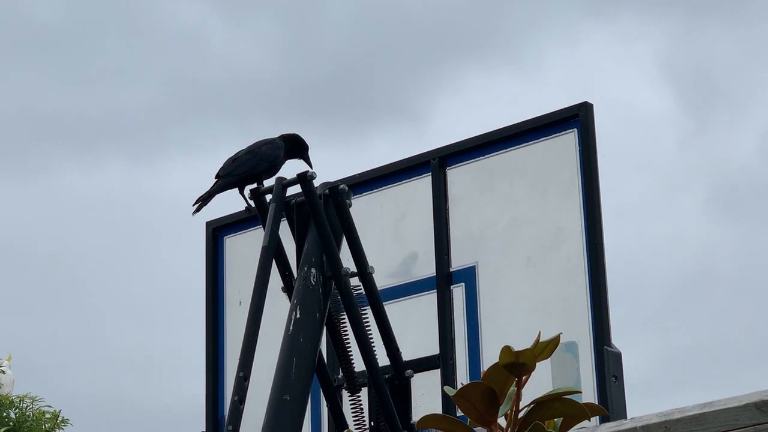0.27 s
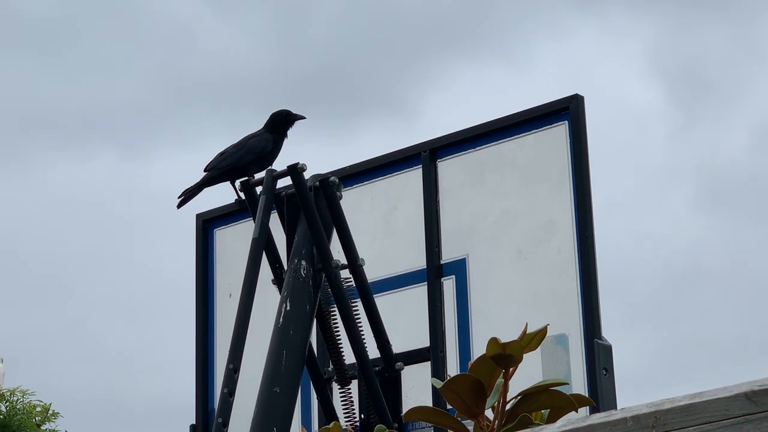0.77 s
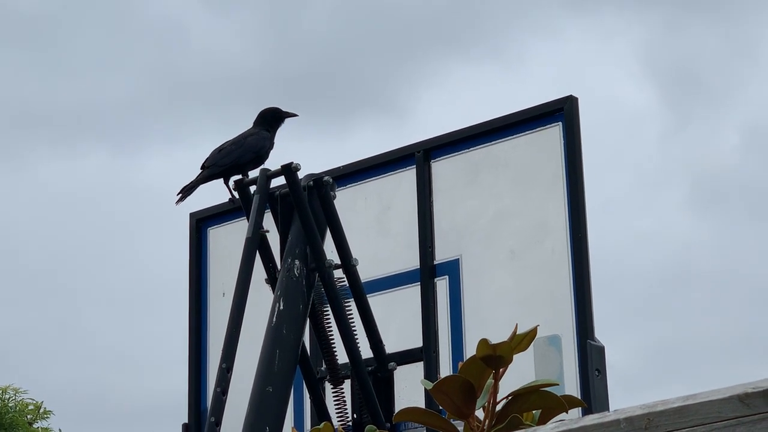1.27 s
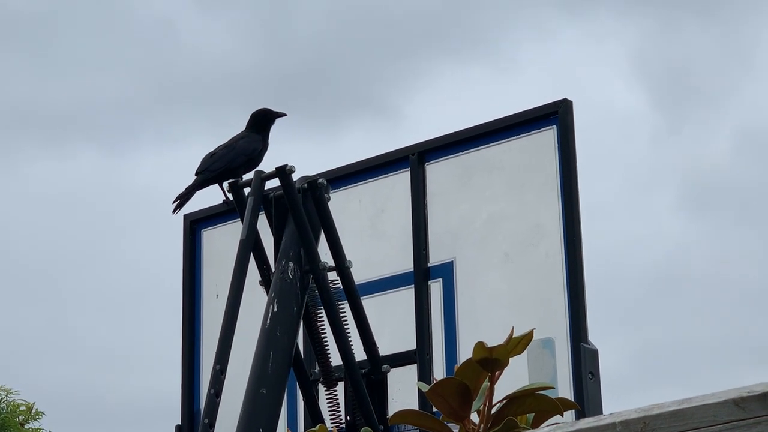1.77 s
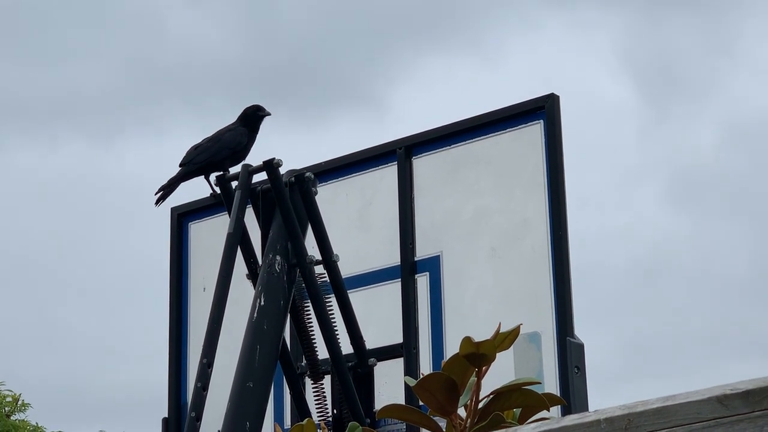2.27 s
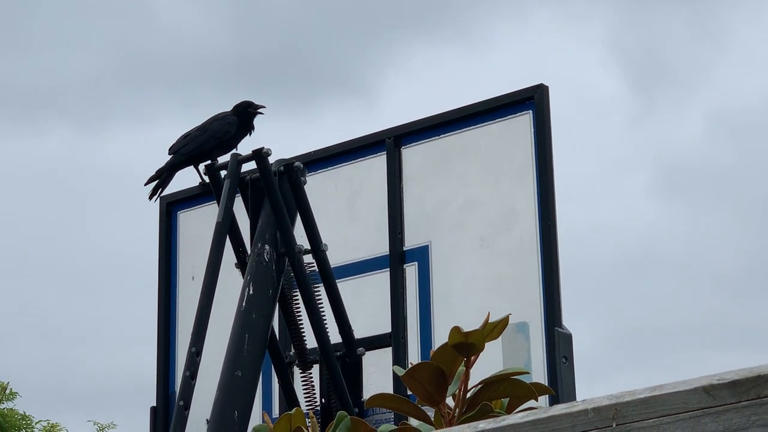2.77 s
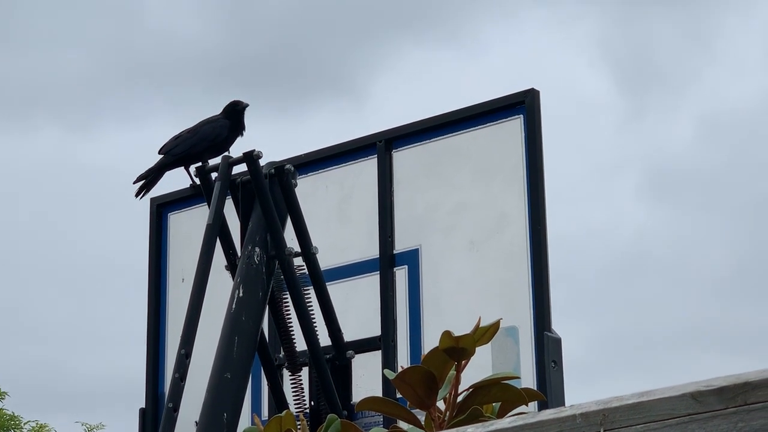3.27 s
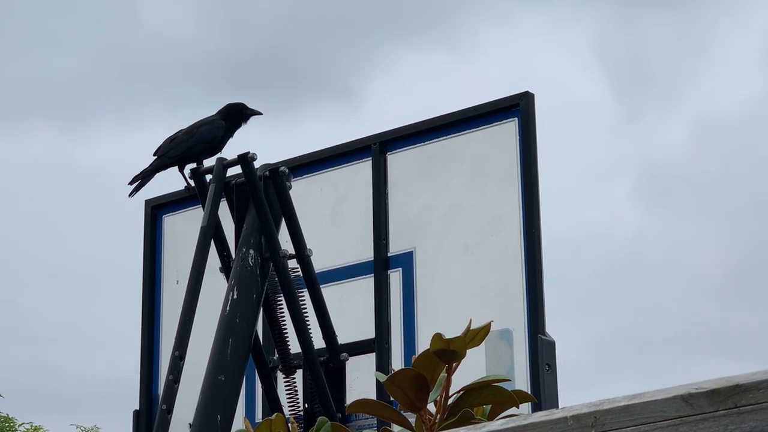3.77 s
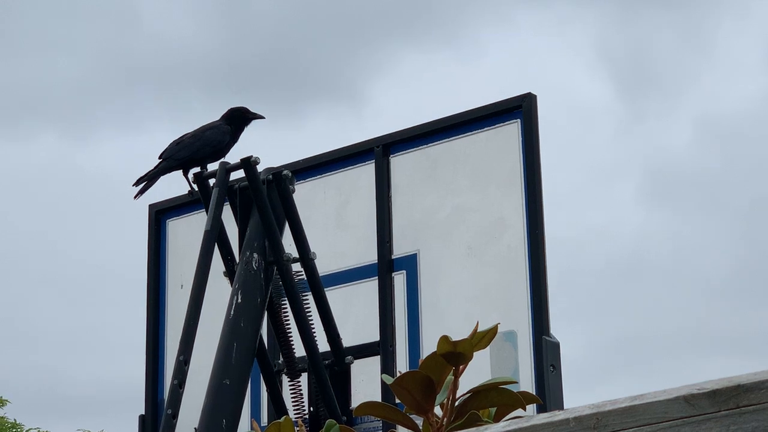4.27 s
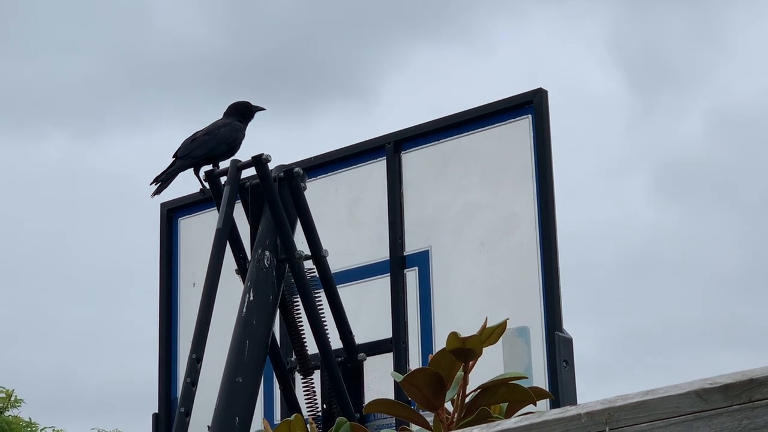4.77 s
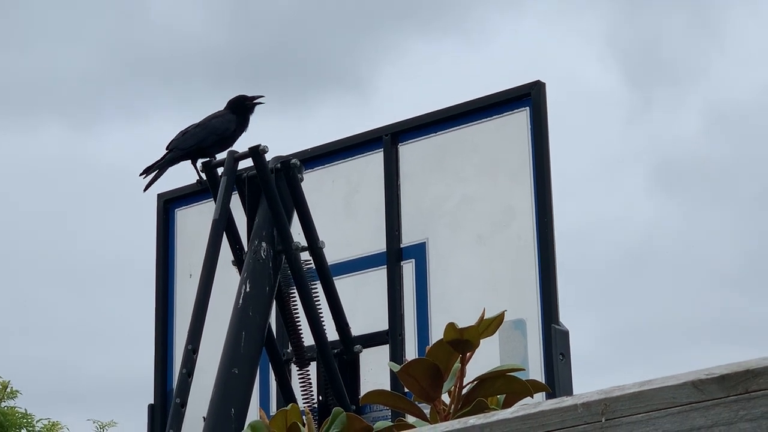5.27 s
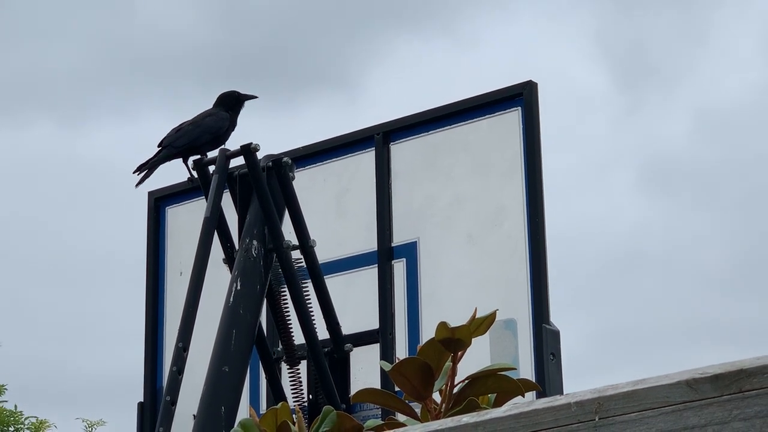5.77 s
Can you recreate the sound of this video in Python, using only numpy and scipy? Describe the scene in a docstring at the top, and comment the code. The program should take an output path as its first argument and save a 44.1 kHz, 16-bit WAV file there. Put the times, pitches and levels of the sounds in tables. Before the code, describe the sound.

A perched crow gives three short, hoarse caws, starting about halfway through and growing louder. A small bird's thin chirps and gliding whistles come before and between them, along with three faint ticks later on. Underneath, a far propeller plane hums, slowly sinking in pitch, and distant traffic murmurs. Wind rumbles lightly on the microphone in the open yard, buffeting it briefly after the second caw.

```python
"""First come the drone of a far propeller plane, sinking in pitch as it passes, and wind buffeting the
two microphone ports. A small songbird scolds and twitters in gliding whistles, and a crow on a perch
caws three times, its slow, sharp pulses ringing the moving resonances of its throat. The perch and the
walls of the yard reflect both birds. Behind them lie three small ticks, another bird's far whistle,
the roar of distant traffic and a faint high hiss."""
import sys
import numpy as np
from scipy import signal
from scipy.fft import rfft, irfft
from scipy.io import wavfile
from scipy.ndimage import uniform_filter1d

SR = 44100
rng = np.random.default_rng(int(sys.argv[2]) if len(sys.argv) > 2 else 0)


def persist_wave(psi):
    """Save psi, clipped to +-1, as 16-bit WAV."""
    counts = np.round(np.clip(psi, -1, 1) * 32767).astype(np.int16)
    wavfile.write(sys.argv[1], SR, np.atleast_2d(counts).T)


N = 266055

# The crow's drive, one list a caw. Each row: time in seconds, effort in dB, pulse rate in Hz.
CAWS = [
    [(2.678, -56.5, 115.2), (2.73, -51.5, 124.9), (2.774, -47, 145.9), (2.854, -44, 155.4),
     (2.92, -43.5, 146.8), (2.976, -48, 129.7), (2.992, -51.5, 120.6), (3.012, -68, 116.3)],
    [(3.412, -49, 96.4), (3.445, -42.5, 119.5), (3.477, -37, 145.5), (3.501, -33, 165.7),
     (3.569, -30.5, 186.7), (3.613, -33.5, 166.7), (3.64, -37.5, 125.1), (3.665, -61.5, 88.7)],
    [(5.102, -54.5, 104.7), (5.125, -55, 121.1), (5.14, -39.5, 134.4), (5.161, -34, 161.3),
     (5.197, -30.5, 192.9), (5.251, -29.5, 206.1), (5.323, -31.5, 178.2), (5.36, -34.5, 151.1),
     (5.387, -41, 115), (5.405, -70, 106)],
]
# Timbre of each caw, mouth wide open. Each row: first, second and third resonance in Hz; levels of
# rasp, top snap and third resonance in dB; unevenness of the pulses as a factor; hoarseness in dB.
OPEN_MOUTH = [(1530, 2690, 4450, -15.5, -33, -16.5, 3.1, -8.5),
              (1556, 2470, 4400, -4.5, -14.5, -14.5, 1.1, -15),
              (1486, 2365, 4130, -6, -23.5, -15, 0.98, -12.5)]
# Each caw, mouth shut. Each row: the three resonances as shares of their open pitch, rasp change in dB.
SHUT_MOUTH = [(0.815, 0.98, 0.79, -6.5), (0.71, 0.78, 0.86, -4.5), (0.75, 0.82, 0.82, -10.5)]
# For each of the three resonances, the share of its rise that stays when the pulses slow again.
RISE_HELD = (0.77, 0.089, 0.65)
# The two lowest throat resonances. Each row: width in Hz, gain in dB.
THROAT = [(280, 6), (500, 1.5)]
# High resonances of the rasp. Each row: open-mouth centre in Hz, width in Hz, gain in dB.
RASP_BANDS = [(5350, 1200, -5), (6700, 1200, -4), (8900, 1900, 0), (11000, 1500, -12)]

# The songbird's phrase. Each row: onset and length in seconds before stretching; start, middle and
# end pitch in Hz; relative level in dB; roughness from 0 to 1.
PHRASE = [(0, 0.039, 1680, 1734, 1774, -4, 0.2), (0.027, .055, 4070, 4300, 4950, 0, 0.26),
          (0.062, .04, 5400, 5600, 5750, -7, .3)]
# Repeats of the phrase. Each row: start in seconds, level in dB, time stretch as a factor.
PHRASE_REPEATS = [(.774, -49.5, 1), (1.6, -73, 1.2), (3.77, -61, 1.05), (4.984, -63, 1.44)]
# Rough single notes. Each row: start and length in seconds; start, middle and end pitch in Hz;
# level in dB.
SCOLDS = [(.496, .023, 2620, 2630, 2580, -67.5), (.508, 0.04, 4100, 3850, 3570, -67.5),
          (.549, 0.028, 3680, 3380, 2980, -62.5), (.555, 0.054, 6300, 5870, 5670, -70.5),
          (.609, 0.041, 5130, 4660, 4140, -66), (.638, 0.018, 6900, 6650, 6400, -72),
          (.664, 0.064, 3830, 4300, 4500, -77), (.733, 0.039, 3020, 2970, 3020, -64.5),
          (.752, 0.035, 1887, 1898, 1770, -56.5), (1.675, 0.074, 5200, 5160, 5350, -77),
          (2.495, 0.029, 2130, 2214, 2320, -74.5), (2.518, 0.078, 3480, 3760, 3930, -64),
          (2.532, 0.2, 5100, 5150, 5320, -73.5), (2.51, 0.039, 6800, 7050, 6900, -82),
          (2.69, 0.057, 4130, 4380, 4300, -62)]
# Short clear glides, with the same columns.
TWITTER = [(4.09, 0.02, 4220, 4510, 4930, -59.5), (4.1, 0.033, 3510, 3680, 3700, -60),
           (4.133, 0.014, 4040, 4400, 4900, -59), (4.145, .018, 3520, 3800, 4360, -57),
           (4.18, 0.015, 3630, 3770, 4100, -59.5), (4.24, 0.051, 4650, 4660, 4980, -60.5),
           (4.265, 0.012, 5380, 5700, 5470, -63), (4.305, .025, 3820, 4100, 4400, -60.5)]
# Another bird's plain whistle, one such row.
FAR_WHISTLE = (4.505, .15, 1780, 1900, 1680, -67.5)
# Notes that shoot up and droop. Each row: start and length in seconds, crest in Hz, level in dB.
HOOKS = [(4.158, .022, 5330, -60), (4.193, 0.039, 5600, -65.5), (4.222, 0.033, 5570, -62),
         (4.319, .038, 5410, -62.5)]
# Spells of faint scratchy chatter. Each row: start and end in seconds, level of a chip in dB.
CHATTER_SPELLS = [(0.499, .9, -79), (1.578, 1.8, -94), (2.499, 2.698, -83.5), (3.778, 3.933, -87),
                  (4.067, 4.393, -79.5), (4.954, 5.12, -83)]
# Decline of a whistle's harmonics. Each row: pitch of the note in Hz, step per overtone in dB.
OVERTONE_SLOPE = [(1750, -1), (3000, -18), (4200, -9), (5300, -24)]
# Response of the beak. Each row: frequency in Hz, gain in dB.
BEAK_RESPONSE = [(1900, -6.5), (3200, 9.5), (5000, 5), (8500, 2), (11000, -28)]

# Pitch of the propeller. Each row: time in seconds, blade tone in Hz.
BLADE_HZ = [(0, 121.8), (.9, 120), (3.4, 115.8), (4.8, 113.4), (6.03, 112.4)]
# Strength of the drone. Each row: time in seconds, levels of the first and second harmonic in dB.
BLADE_LEVELS = [(0, -34.5, -62), (.12, -36.5, -55), (.3, -42, -51.5), (.5, -45.5, -54), (.64, -39.5, -59),
                (1.03, -46.5, -67.5), (1.15, -45.5, -53), (1.9, -42.5, -45.5), (2.18, -40.5, -66),
                (2.45, -40.5, -54.5), (2.8, -39, -47), (3.2, -40, -49.5), (3.55, -38.5, -59),
                (3.8, -41.5, -54.5), (4.35, -42, -45), (4.8, -43, -54), (5.12, -40.5, -54.5),
                (5.45, -37.5, -48.5), (6.03, -36, -54.5)]
# The drone at the ports, by harmonic. Each row: left lead in radians, left minus right in dB.
BLADE_STEREO = [(0.08, -5.5), (-0.58, -7), (0.92, -5.5)]
# Gusts. Each row: time of the top in seconds, level change in dB, half width in seconds.
GUSTS = [(0.01, 4.5, 0.045), (.87, -1, 0.035), (2.33, 1.5, 0.21), (3.632, 1.5, 0.035), (3.718, 8.5, 0.055),
         (3.83, 11.5, 0.034), (4.151, 5, 0.095), (4.45, 4.5, 0.17), (5.049, 4, 0.047)]
# Gusts that thump the ports. Each row: start in seconds, peak in dB, pitch in Hz, length in seconds.
THUMPS = [(3.713, -31, 56.5, .06), (3.821, -21.5, 97.8, 0.029), (3.857, -27, 60, 0.037),
          (5.042, -39, 59, 0.076)]
# Nearby ticks. Each row: start in seconds, then bands of level in dB, centre and width in Hz and
# t60 in seconds.
TICKS = [(3.98, [(-50, 2200, 806, 0.013), (-58, 6000, 2500, 0.039), (-51, 11000, 3500, 0.015)]),
         (4.443, [(-45, 3400, 930, 0.014)]), (5.468, [(-39.5, 883, 400, 0.043), (-50.5, 3770, 1100, 0.078),
         (-62, 6700, 1400, 0.056)])]
# Swell of the far roar. Each row: time in seconds, level in dB.
ROAR_LEVEL = [(0, -53.5), (.9, -54.5), (1.9, -51.5), (2.5, -54.5), (3.1, -51), (4.5, -51.5), (4.9, -53),
              (5.3, -49.5), (5.7, -54.5), (6.03, -54)]

# Noise spectra. Each row: frequency in Hz, relative spectral density in dB.
WIND_SPECTRUM = [(15, -63), (25, 2.5), (50, 12.5), (90, 11), (150, 1.5), (220, -2), (300, -15.5),
                 (420, -55)]
ROAR_SPECTRUM = [(160, -17.5), (270, -2), (315, -1.5), (384, -9.5), (418, -4.5), (502, -10), (713, -9),
                 (1170, -16.5), (1940, -21.5), (3400, -33), (7800, -51.5), (10100, -85.5), (17200, -120)]
HISS_SPECTRUM = [(4000, -30), (7000, -12), (8300, 0), (10800, -1), (11700, -8), (12700, -3), (14500, -3),
                 (16000, -5)]
# Likeness of the two channels. Each row: frequency in Hz, coherence from 0 to 1.
WIND_COHERENCE = [(30, 0.94), (150, 1), (300, 0.059)]
ROAR_COHERENCE = [(300, 0.27), (600, 0.72), (1300, 0.035), (2500, 0.034), (7000, .1)]
# Phase between the ports; birds and hiss share the treble. Each row: frequency in Hz, left lead in
# radians.
CROW_LEAD = [(400, .3), (1800, .35), (2600, .75), (3000, 1.4), (3400, 2.5), (3700, 3), (4200, 2.1),
             (5200, 2.5), (6200, 1.6)]
BIRD_LEAD = [(2000, 1), (3600, 2.6), (4400, 1.4), (5400, 1), (6500, 1.5)]
TREBLE_LEAD = [(7500, 2.2), (8500, 1), (9500, 0), (10500, -1.5), (11500, -3.1), (12500, -3.9),
               (13500, -6.1), (15000, -6.6)]
ROAR_LEAD = [(300, 0.5), (600, 2.5), (1300, 6), (7000, 11.5)]
# Level step between the ports. Each row: frequency in Hz, left minus right in dB.
CROW_BALANCE = [(500, 1), (1400, -2.5), (2500, -3.5), (3400, -3), (4300, -7), (5800, -11), (6800, 0.5),
                (15000, 0)]
BIRD_BALANCE = [(3000, 5), (4500, -1.5), (5600, -1), (6500, -2), (8000, 1)]
WIND_BALANCE = [(40, 8.5), (150, -15.5), (300, -3.5)]
ROAR_BALANCE = [(300, -7.5), (600, 2), (7000, -1)]
# Decay of echoes from the perch and from walls and fences. Each row: frequency in Hz, t60 in seconds.
PERCH_DECAY = [(500, 0.021), (2000, 0.079), (5000, 0.16), (15000, .05)]
YARD_DECAY = [(500, 0.1), (2000, 0.46), (5000, 0.52), (9000, 0.066), (15000, 0.088)]
# Colour of the microphone. Each row: frequency in Hz, gain in dB.
MIC_RESPONSE = [(20, -24), (40, -3), (60, 0), (12500, 0), (14500, -3), (16000, -8)]


def caw(contour, open_mouth, shut_mouth):
    """Source and filter: uneven pulses and puffs of air ring resonances that rise as the mouth opens."""
    start = contour[0][0]
    t = np.arange(start, contour[-1][0], 1 / SR)
    effort_db, pulse_hz = curves(contour, t)
    *open_hz, rasp_db, snap_db, third_db, uneven, hoarse_db = open_mouth
    *shut_shares, shut_db = shut_mouth
    rise = (pulse_hz - pulse_hz[0]) / (pulse_hz.max() - pulse_hz[0])
    mouth = uniform_filter1d(rise, size=800).clip(0, 1)  # opens as the pulses quicken
    widest = np.maximum.accumulate(mouth)
    *throat_hz, third_hz = [hz * (share + (1 - share) * (mouth + held * (widest - mouth)))
                            for hz, share, held in zip(open_hz, shut_shares, RISE_HELD)]

    cycles = np.cumsum(pulse_hz * (1 + .005 * uneven * wobble(len(t), size=150))) / SR
    per_pulse = rng.standard_normal((int(cycles[-1]) + 1, 3))  # random strengths
    drive_spread, spit_spread, snap_spread = per_pulse[cycles.astype(int)].T
    pulses = unit_rms(np.diff(np.floor(cycles), prepend=0) / np.sqrt(pulse_hz))  # same power at any rate
    since_pulse = (cycles % 1) / pulse_hz
    puffs = unit_rms((cycles > 1) * np.exp(-since_pulse / 0.00081) * rng.standard_normal(len(t)))
    drive = (pulses + .07 * uneven * puffs) * amp(.5 * uneven * drive_spread)
    spit = (pulses + .6 * puffs) * amp(.9 * uneven * spit_spread)

    throat = sum((-1) ** k * amp(db) * resonance(drive, hz, width)
                 for k, (hz, (width, db)) in enumerate(zip(throat_hz, THROAT)))
    leak = resonance(drive, 990, width=1200)  # low harmonics leak past the throat
    gap_hz = sum(throat_hz) / 2  # breath fills the gap between the two resonances
    breath = bandpass(bandpass(puffs, gap_hz, width=1000), gap_hz, width=910)
    voice = unit_rms(throat) - amp(-14.5) * unit_rms(leak) + amp(hoarse_db) * unit_rms(breath)

    closed = 1 - mouth
    rasp = -sum((-1) ** k * amp(db) * resonance(spit, hz * (1 - .17 * closed), width)
                for k, (hz, width, db) in enumerate(RASP_BANDS))
    snap = resonance((pulses + .8 * puffs) * amp(2 * snap_spread), 13600, width=3600)
    third = resonance(drive + .3 * spit, third_hz, width=650)
    voice += amp(third_db + closed) * unit_rms(third)
    voice += amp(rasp_db + shut_db * closed) * unit_rms(rasp)
    voice += amp(snap_db + (shut_db - 1) * closed) * unit_rms(snap)
    return start, amp(effort_db) * voice


def whistle(length, start_hz, middle_hz, end_hz, level_db, rough, warp=1, tilt_db=0):
    """A gliding harmonic series filtered by the beak; random pitch and amplitude modulation roughen it."""
    n = round(length * SR)
    parabola = np.polyfit([0, .5, 1], [start_hz, middle_hz, end_hz], 2)
    hz = np.polyval(parabola, (np.arange(n) / n) ** warp)  # warp under 1 brings the middle early
    phase = 2 * np.pi * np.cumsum(hz * (1 + .06 * rough * wobble(n, size=24))) / SR
    slope_db = at_hz(OVERTONE_SLOPE, middle_hz) + tilt_db
    tone = np.zeros(n)
    for k in range(1, 7):
        gain = amp(slope_db * (k - 1) + at_hz(BEAK_RESPONSE, k * hz))
        tone += gain * (k * hz < SR / 2.5) * np.sin(k * phase)
    flutter = 1 + 1.3 * rough * wobble(n, size=40)
    return amp(level_db) * unit_rms(tone) * flutter * signal.windows.tukey(n, .45)


def birdsong():
    """Frequency glides form the songbird's phrases, scolds, twitter and hooks, and another bird's call."""
    song = np.zeros(N)
    for start, db, stretch in PHRASE_REPEATS:
        for onset, length, *pitches, step_db, rough in PHRASE:
            add(song, start + stretch * onset, whistle(stretch * length, *pitches, db + step_db, rough))
    for notes, rough in [(SCOLDS, .5), (TWITTER, .18)]:
        for start, *note in notes:
            add(song, start, whistle(*note, rough))
    for start, length, crest, db in HOOKS:
        add(song, start, whistle(length, .62 * crest, crest, .88 * crest, db, rough=.18, warp=.5))
    start, *note = FAR_WHISTLE
    add(song, start, whistle(*note, rough=.5, tilt_db=-38))
    return song


def chatter(chips_per_s=120, chip_s=.02, range_hz=(3000, 7000)):
    """Superposition of short rough chips, random in time, pitch and glide, gives a scratchy texture."""
    chips = np.zeros(N)
    for start, end, db in CHATTER_SPELLS:
        count = round(chips_per_s * (end - start))
        for when, height, glide in rng.random((60, 3))[:count]:
            bend = 1 + .25 * (glide - .3) * np.array([-1, 0, 1])
            pitches = np.interp(height, [0, 1], range_hz) * bend
            add(chips, start + when * (end - start), whistle(chip_s, *pitches, db, rough=1))
    return chips


def reflections(crow, bird):
    """Reverberation: the perch scatters the calls quickly, and walls and fences add a longer tail."""
    tail = echoes(amp(-15) * crow + amp(-18) * bird, YARD_DECAY)
    return echoes(amp(-7.5) * crow + amp(-8) * bird, PERCH_DECAY) + tail


def plane():
    """Three harmonics of the blade tone sink as the plane passes; moving air modulates phase and level."""
    t = np.arange(N) / SR
    blade_phase = 2 * np.pi * np.cumsum(curves(BLADE_HZ, t)[0]) / SR
    third_db = -68 + 4.5 * wobble(N, size=3000)  # the third harmonic comes and goes
    levels = curves(BLADE_LEVELS, t) + [third_db]
    drone = np.zeros((2, N))
    for k, (db, (lead, step_db)) in enumerate(zip(levels, BLADE_STEREO), 1):
        phase = k * (blade_phase + 0.23 * wobble(N, size=1500))
        pair = np.array([amp(step_db / 2) * np.sin(phase + lead), amp(-step_db / 2) * np.sin(phase)])
        drone += np.sqrt(2) * amp(db + 0.5 * wobble(N, size=2000)) * pair
    return drone


def wind(steady_db=-49, lumps_db=1.5):
    """Pressure fluctuations at the ports: low noise that swells in gusts, with brief tonal thumps."""
    t = np.arange(N) / SR
    gusts_db = sum(db * np.exp(-((t - top) / half_width) ** 2) for top, db, half_width in GUSTS)
    level = amp(steady_db + lumps_db * wobble(N, size=2000) + gusts_db)
    lead = [(20, 0.009), (400, 0.011)]
    rumble = stereo_noise(WIND_SPECTRUM, WIND_COHERENCE, lead, WIND_BALANCE, patchy_db=0.5)
    thumps = np.zeros(N)
    for start, db, hz, length in THUMPS:
        age = np.arange(0, length, 1 / SR)
        add(thumps, start, amp(db) * np.sin(np.pi * age / length) ** 2 * np.sin(2 * np.pi * hz * age))
    return level * rumble + thumps


def ticks(attack_s=0.00068):
    """Damped resonance: each tick is noise in one or more bands, dying exponentially."""
    track, t = np.zeros(N), np.arange(2000) / SR
    for start, bands in TICKS:
        for db, hz, width, t60 in bands:
            burst = unit_rms(resonance(rng.standard_normal(len(t)), hz, width))
            add(track, start, amp(db - 60 * t / t60) * (1 - np.exp(-t / attack_s)) * burst)
    return track


def far_roar():
    """Distant traffic and engine wash add up to partly coherent noise that slowly swells and ebbs."""
    level = amp(curves(ROAR_LEVEL, np.arange(N) / SR)[0])
    return level * stereo_noise(ROAR_SPECTRUM, ROAR_COHERENCE, ROAR_LEAD, ROAR_BALANCE, patchy_db=1.92)


def hiss(level_db=-82):
    """Faint treble noise, almost fully coherent between the ports in its top range."""
    coherence, centred = [(6000, .4), (9000, 0.99), (16000, 1.0)], [(20, 0), (400, 0)]
    return amp(level_db) * stereo_noise(HISS_SPECTRUM, coherence, TREBLE_LEAD, centred, patchy_db=1)


def echoes(x, decay):
    """Convolution with sparse taps of random sign, a set for each side; each band dies at its own rate."""
    taps = np.zeros((2, SR))
    delays = np.arange(40, SR - 20, 20) + rng.integers(0, 20, (2, (SR - 41) // 20))
    np.put_along_axis(taps, delays, rng.choice([-1., 1.], delays.shape), 1)
    hz, t, spectra = signal.stft(taps, SR, nperseg=128)
    tail = signal.istft(spectra * amp(-60 * t / at_hz(decay, hz)[:, None]), SR, nperseg=128)[1]
    return signal.fftconvolve(x[None], tail / np.linalg.norm(tail[0]), axes=1)[:, :N]


def at_ports(x, lead, balance):
    """A point source reaches the two ports with a phase lead and level step that depend on frequency."""
    hz = np.fft.rfftfreq(N, 1 / SR)
    left_gain = amp(at_hz(balance, hz) / 2) * np.exp(.5j * at_hz(lead, hz))
    return irfft(rfft(x) * np.array([left_gain, 1 / left_gain]), N)


def stereo_noise(spectrum, coherence, lead, balance, patchy_db):
    """Partial coherence: two channels share part of a random spectrum with drifting patches; rms 1."""
    frames, hz = N // 256 + 5, np.fft.rfftfreq(1024, 1 / SR)[:, None]
    left_re, left_im, own_re, own_im, patches = rng.standard_normal((frames, 513, 5)).T
    patches = unit_rms(uniform_filter1d(uniform_filter1d(patches, 8, axis=0), 12, axis=1))
    shared = np.clip(at_hz(coherence, hz), 0, 1)
    left, own = left_re + 1j * left_im, own_re + 1j * own_im
    right = shared * left * np.exp(-1j * at_hz(lead, hz)) + np.sqrt(1 - shared ** 2) * own
    left_gain = amp(at_hz(balance, hz) / 2)
    colour = amp(at_hz(spectrum, hz) + patchy_db * patches)
    spectra = np.array([left * left_gain, right / left_gain]) * colour
    return unit_rms(signal.istft(spectra, nperseg=1024, noverlap=768)[1][:, :N])


def bandpass(x, hz, width):
    """Heterodyne filter: shifts the frequency or curve hz down to zero, smooths, and shifts back."""
    carrier = np.exp(2j * np.pi * np.cumsum(hz * np.ones(len(x))) / SR)
    pole = np.exp(-np.pi * width / SR)
    return 2 * (carrier * signal.lfilter([1 - pole], [1, -pole], x / carrier)).real


def resonance(x, hz, width):
    """Two equal band-passes in cascade, each width Hz wide, give steeper skirts."""
    return bandpass(bandpass(x, hz, width), hz, width)


def wobble(n, size):
    """Low-passed noise of rms 1, smooth over size samples."""
    return unit_rms(uniform_filter1d(uniform_filter1d(rng.standard_normal(n), size), size))


def amp(db):
    """Decibels to gain."""
    return 10 ** (np.asarray(db) / 20)


def unit_rms(x):
    """Scales to rms 1."""
    return x / np.sqrt(np.mean(x ** 2) + 1e-20)


def at_hz(table, hz):
    """Interpolates a table over log frequency."""
    frequencies, values = np.transpose(table)
    return np.interp(np.log(hz + 1), np.log(frequencies + 1), values)


def curves(table, t):
    """Interpolates each column of a table at times t."""
    times, *columns = np.transpose(table)
    return [np.interp(t, times, column) for column in columns]


def add(mix, start, sound):
    """Superposes a sound at start seconds."""
    part = mix[round(start * SR):][:len(sound)]
    part += sound[:len(part)]


def scene():
    """Superposition: birds and ticks, the birds' echoes, and the plane, roar, wind and hiss."""
    crow, bird = np.zeros(N), birdsong() + chatter()
    for contour, open_mouth, shut_mouth in zip(CAWS, OPEN_MOUTH, SHUT_MOUTH):
        add(crow, *caw(contour, open_mouth, shut_mouth))
    direct = at_ports(crow + ticks(), CROW_LEAD + TREBLE_LEAD, CROW_BALANCE)
    direct += at_ports(bird, BIRD_LEAD + TREBLE_LEAD, BIRD_BALANCE)
    return direct + hiss() + reflections(crow, bird) + plane() + far_roar() + wind()


def record(dry):
    """Linear filtering: the microphone colours the sound, then a low-pass limits its band."""
    coloured = irfft(rfft(dry) * amp(at_hz(MIC_RESPONSE, np.fft.rfftfreq(N, 1 / SR))), N)
    lowpass = signal.firwin(1023, cutoff=15850, window=("kaiser", 9), fs=SR)
    return signal.oaconvolve(coloured, lowpass[None], "same")


dry = scene()
out = record(dry)
persist_wave(out)
```